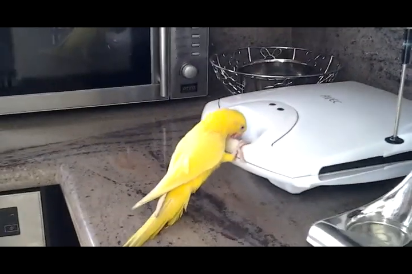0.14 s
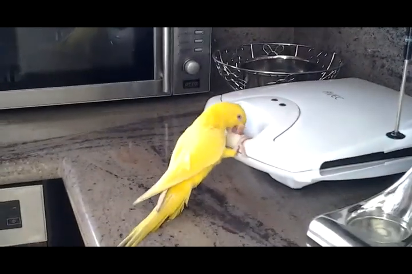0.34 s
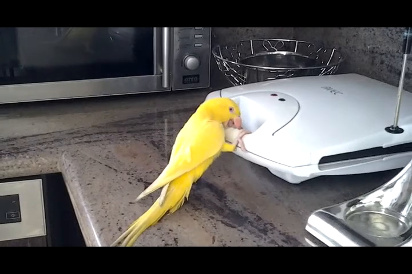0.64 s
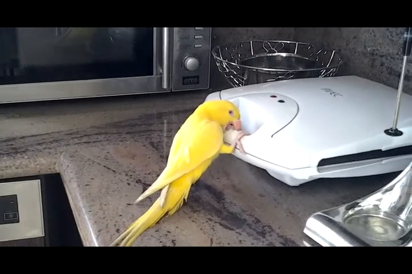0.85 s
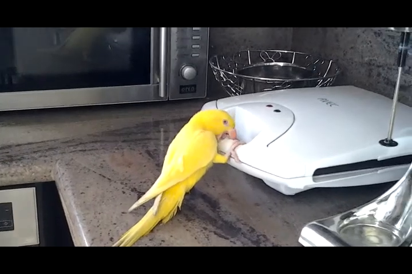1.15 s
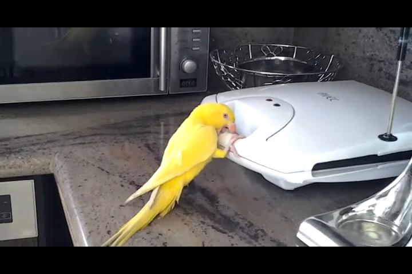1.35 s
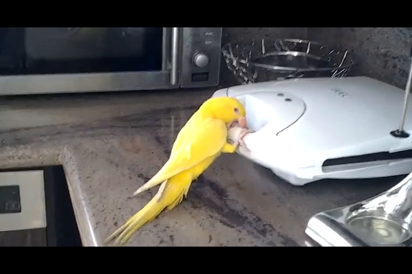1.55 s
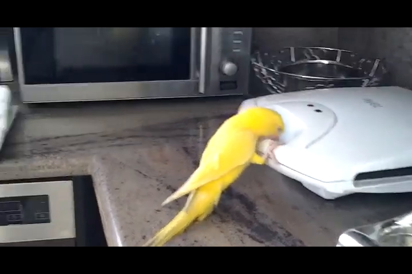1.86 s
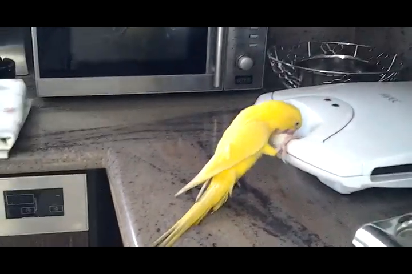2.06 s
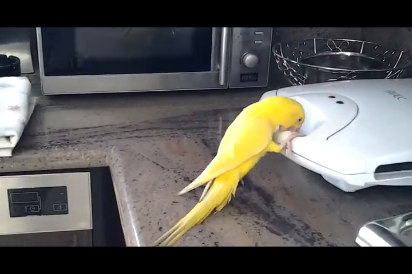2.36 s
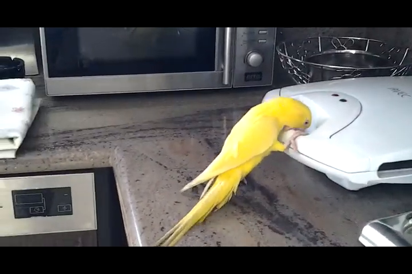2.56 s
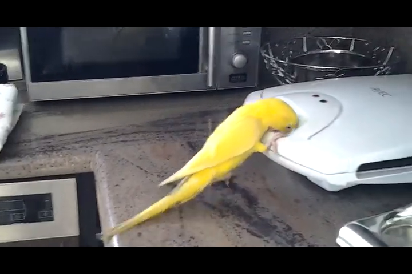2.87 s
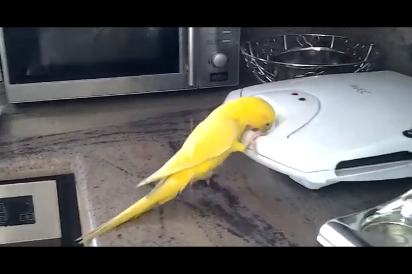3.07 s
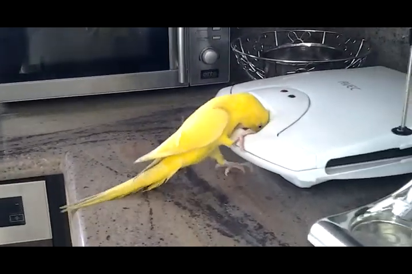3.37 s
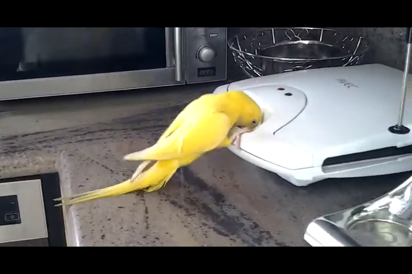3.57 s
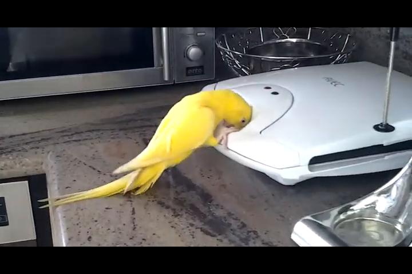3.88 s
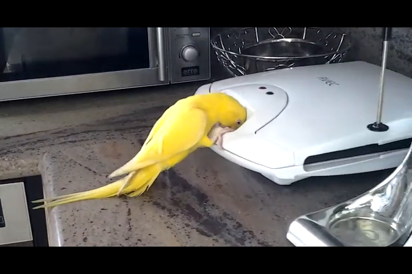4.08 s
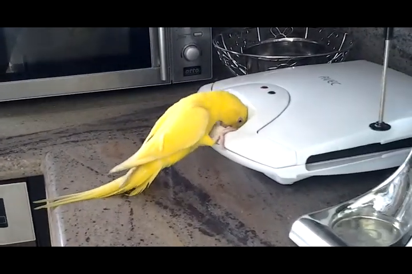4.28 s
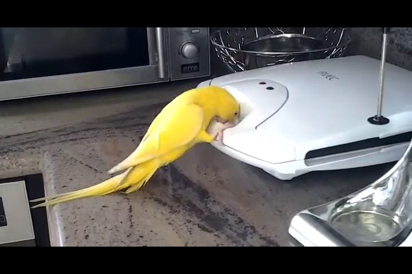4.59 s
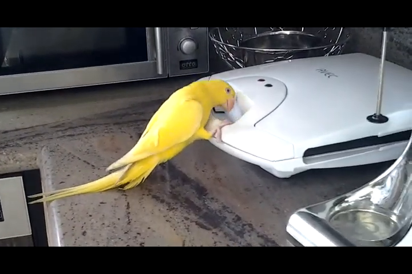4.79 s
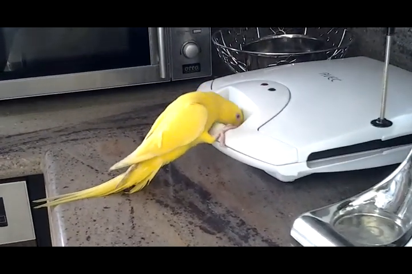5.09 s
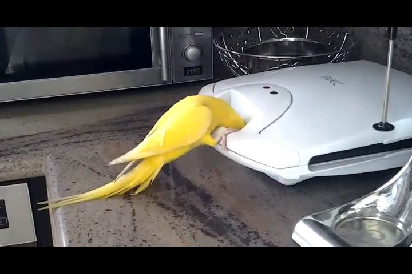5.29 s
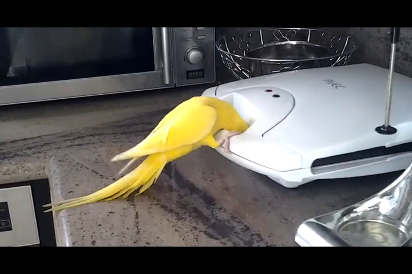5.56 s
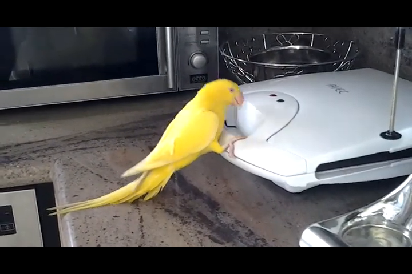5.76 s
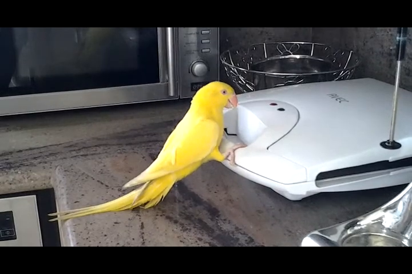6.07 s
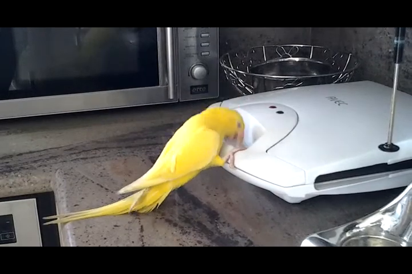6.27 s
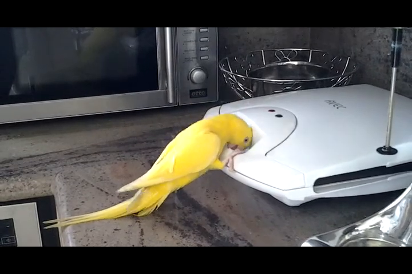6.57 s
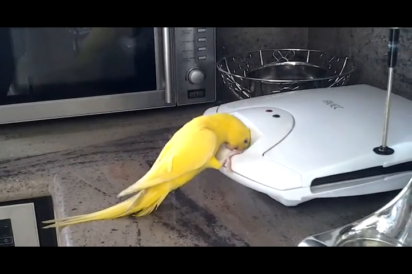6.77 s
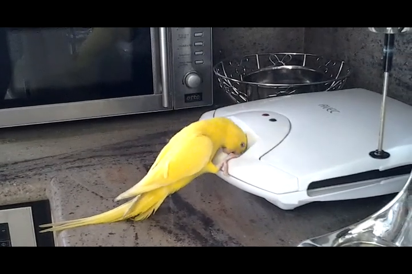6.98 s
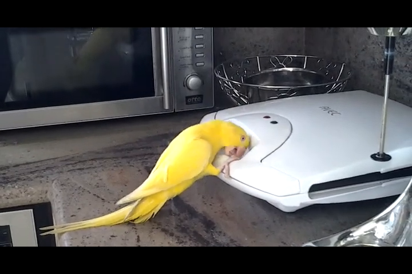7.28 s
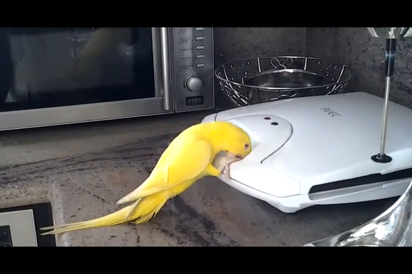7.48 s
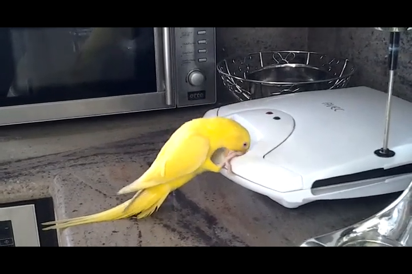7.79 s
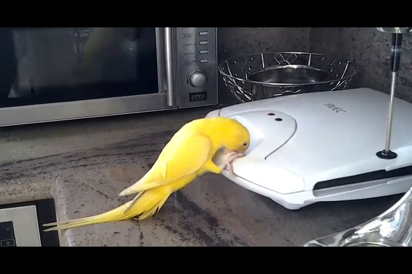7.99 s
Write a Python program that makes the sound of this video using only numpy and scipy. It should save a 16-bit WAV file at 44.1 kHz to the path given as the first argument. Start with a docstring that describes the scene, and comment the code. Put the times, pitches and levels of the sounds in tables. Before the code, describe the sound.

Uneven pecks and small scrapes of a bird's beak on a plastic shell, each with a short kitchen echo.

```python
"""A hard-walled kitchen, a phone microphone a metre from a parrot on an appliance's plastic lid.
Rumble and wavering hiss come first. The beak slides, lets go and pecks: each contact is a rattle of
slips that rings the lid and its hollow shell, and the walls add a tail. The loudest peck lands at 2 s.
At 3.5 s the beak drags across the lid and flicks a thin metal latch. The pecks thin out around 5 s,
then gather again to the end."""
import sys
import numpy as np
from scipy import signal
from scipy.fft import rfft, irfft
from scipy.io import wavfile
from scipy.ndimage import uniform_filter1d

SR = 44100
rng = np.random.default_rng(int(sys.argv[2]) if len(sys.argv) > 2 else 0)


def store_wav(level_fs):
    """Save 16-bit WAV to argv[1]."""
    pcm = np.round(np.clip(np.atleast_2d(level_fs), -1, 1) * 32767)
    wavfile.write(sys.argv[1], SR, pcm.T.astype(np.int16))


N = 358974

# colour of the rumble and hiss at the microphone: (frequency [Hz], relative density [dB])
FLOOR_SPECTRUM = [(15, -18), (25, -19), (43, -12), (103, -4), (234, -1.5), (716, -6), (775, -4.5),
                  (1680, -8.5), (4870, -12.5), (5860, -16), (6700, -13), (9990, -12), (13400, -12),
                  (14500, -16.5)]
# the longest dips of the hiss: (time [s], depth [dB], length [ms])
HISS_DIPS = [(0.207, 9.5, 50), (1.397, 4.5, 75), (1.747, 5, 77), (3.077, 9, 34), (4.654, 12.5, 19),
             (4.844, 5, 33), (5.201, 4, 88), (6.687, 4.5, 39), (7.545, 12, 24), (7.685, 7, 36)]
# the beak slides, pressing harder until it lets go: (start [s], end [s], last level [dB], treble [dB])
PRESSED_SLIDES = [(0.25, 0.293, -56, -7.5), (2.429, 2.453, -48, 2.5), (7.576, 7.596, -34.5, -17.5),
                  (7.946, 7.967, -56, -8), (7.99, 8.033, -54, -19.5)]
# reverberation of the kitchen: (band centre [Hz], t60 [s])
KITCHEN_DECAY = [(450, 0.96), (900, 0.6), (1900, 0.76), (4000, 0.51), (8500, 0.43)]
# beak and claw contacts: (time [s], level [dB], hardness [dB], panel pitch [Hz], tail [dB], contact [ms])
CONTACTS = [(0.295, -33.5, 0.4, 1170, 0.5, 9.7), (0.314, -40.5, 1, 1150, 0.5, 16),
            (0.809, -41.5, 5, 696, -1.5, 14), (1.818, -44.5, 1.4, 1520, 6, 4),
            (1.851, -41, -6, 490, -7, 11), (1.973, -9.5, -1.7, 1540, -2.1, 7.8),
            (2.254, -27, -2.7, 2203, -1.5, 12), (2.346, -34, -0.2, 1860, 0.5, 3.8),
            (2.452, -18, -2.5, 1070, 1.5, 10.8), (2.572, -25.5, -1.5, 1515, -6, 2.9),
            (2.753, -23.5, -3.4, 1115, -2.5, 8.9), (2.923, -26, -7, 1310, -10, 5.3),
            (3.109, -39, -8, 1560, 0, 4), (3.171, -50, 8, 980, 6, 14), (3.295, -53, 14.5, 1100, -12, 35),
            (3.385, -32.5, -3.5, 980, 2, 5), (3.409, -32, 6.5, 496, -1.5, 12),
            (3.502, -14.5, 7, 730, -4, 8.8), (3.59, -28, 8, 1290, -1.5, 6.3),
            (3.61, -31, -9.5, 710, 1.9, 7.1), (3.631, -54, 19, 910, -8, 18),
            (3.746, -46.5, 2.3, 865, 16, 18), (3.874, -29, -0.2, 1060, 0, 14),
            (4.214, -36.5, 2.2, 1400, 3, 6.1), (4.259, -33, -0.5, 2130, -20, 12),
            (4.308, -41.5, 0.2, 1130, 14, 9.5), (4.326, -30, -2, 2050, -22, 8),
            (4.359, -21.5, -1.8, 2120, -5, 13), (4.469, -35, 3, 685, 1, 17.4),
            (4.679, -40.5, 2, 1120, -0.5, 7.8), (5.39, -37, 3, 2550, 0, 9.8),
            (5.61, -37.5, 3.7, 720, -2.1, 9.3), (6.351, -24, 4, 1790, -5, 14),
            (6.395, -22.5, 3, 2210, -2.5, 17.5), (6.741, -40.5, 1.8, 1090, 9.5, 3.9),
            (6.892, -36.5, 1.3, 1100, -1.1, 6.1), (7.012, -32, 2.5, 1860, 5.5, 6.7),
            (7.027, -26, -2, 2130, -9, 15), (7.165, -34.5, 3, 2280, -7.5, 13),
            (7.416, -37, 2.5, 1750, -3, 10.3), (7.595, -23.5, -6.5, 714, -0.8, 9.1),
            (7.754, -32.5, 0, 1130, -6.5, 11.4), (7.906, -37.5, 0.5, 2070, 0.5, 8),
            (7.968, -29, 1.5, 2140, 2, 18), (8.025, -23.5, 0.3, 2150, -1.5, 10)]
# five registers of a contact, thud, body, knock, click and tick: (low edge [Hz], high edge [Hz])
REGISTER_EDGES = [(340, 620), (620, 1250), (1250, 2400), (2400, 4800), (5500, 12000)]
# the same registers: (level [dB], gain with hardness [dB/dB], length [contact times])
REGISTER_COLOUR = [(-4.5, -1, 2.15), (-1, -0.83, 1.28), (3.5, 0.13, 1.31), (5, 1.24, 0.97), (3, 2, 1.15)]
# modes of the lid's stiff edge: (frequency [Hz], level [dB], nominal t60 [s])
RIM_MODES = [(2451, -30.5, 0.0083), (3245, -35, 0.027), (3860, -37.5, 0.017)]
# modes of the hollow shell: (frequency [Hz], level [dB], nominal t60 [s])
SHELL_MODES = [(454.7, -2, 0.33), (494, -4, 0.45), (677, 3, 0.2), (868, -4.5, 0.47), (982, -6.5, 0.74),
               (1040, -12, 0.52), (1073, -1.5, 0.37), (1220, -13, 0.37), (1480, -27.5, 0.28),
               (1560, -9, 0.27), (1835, 5, 0.035), (2090, -1.5, 0.1), (2260, -5, 0.13)]
# flicks of the latch: (time [s], level [dB])
LATCH_FLICKS = [(3.502, -35), (3.63, -31.5), (3.748, -47)]
# modes of the thin metal latch: (frequency [Hz], level [dB], t60 [s])
LATCH_MODES = [(7600, -7, .02), (9800, -1, .03), (9990, -10, .15), (10090, -7, .2), (10150, -9, .16),
               (10890, -2, .03)]
# the beak drags across the lid: (time [s], level [dB], treble [dB])
BEAK_DRAG = [(3.505, -82, -3), (3.52, -35.5, -13), (3.57, -58, 6), (3.62, -41.5, -10), (3.66, -64, 7),
             (3.72, -62, 12)]

RUMBLE_DB, HISS_DB, CROSSOVER_HZ = -68.5, -63.5, 350
FLICKER_DB, SHORT_DIPS, SHORT_DIP_DB, SHORT_DIP_MS = 2, 20, 7.5, 18
LIFT_DB, HALF_LIFT_AT_DB, DUCK_DB, HALF_DUCK_AT_DB, PHONE_MEMORY_S = 12.5, -45.5, -9, -46, 0.059
KITCHEN_DB, FIRST_WALL_S, TAIL_WAVER_SHARE = -38.5, 0.012, 0.1
PANEL_DB, PANEL_T60_S, PANEL_SPREAD = -31, 0.035, 0.055  # spread: neighbour modes, as a share of pitch
SHELL_DB, STRIKE_SPOT_DB, BARE_SLIPS_DB = -40.5, 4.5, 2
FOCUS_DB_PER_OCT, THUD_LATE_MS = 3, 5.495
TOP_HZ = 14750


def undb(db):
    return 10 ** (np.asarray(db) / 20)


def unit(x):
    return x / np.sqrt(np.mean(x ** 2))


def band(x, lo_hz, hi_hz):
    return signal.sosfilt(signal.butter(3, [lo_hz, hi_hz], "band", fs=SR, output="sos"), x)


def waver():
    """The treble flickers at random and dips briefly; returns its gain in dB."""
    t = np.arange(N) / SR
    step = SR // 40
    steps = np.repeat(rng.standard_normal(N // step + 1), step)
    db = FLICKER_DB * uniform_filter1d(steps, step // 2)[:N]
    short = [(when * N / SR, SHORT_DIP_DB, (.5 + size) * SHORT_DIP_MS)
             for when, size in rng.random((SHORT_DIPS, 2))]
    for s, depth_db, length_ms in HISS_DIPS + short:
        db -= depth_db * np.exp(-(2 * (t - s) / (length_ms / 1000)) ** 2)
    return db


def phone_reaction(x, half_at_db):
    """How far the phone reacts, from 0 to 1, to the level it has just heard."""
    keep = np.exp(-1 / (PHONE_MEMORY_S * SR))
    level = np.sqrt(signal.lfilter([1 - keep], [1, -keep], x ** 2))
    return level / (level + undb(half_at_db))


def rumble_and_hiss(heard, waver_db):
    """The noise floor: the phone lets more hiss through with sound and ducks the rumble under clicks."""
    hz = np.arange(N // 2 + 1) * SR / N + 1
    knots_hz, knots_db = np.transpose(FLOOR_SPECTRUM)
    noise = rfft(rng.standard_normal(N)) * undb(np.interp(np.log(hz), np.log(knots_hz), knots_db))
    bass_share = 1 / (1 + (hz / CROSSOVER_HZ) ** 2)
    rumble, hiss = unit(irfft(noise * bass_share, N)), unit(irfft(noise * (1 - bass_share), N))
    lift_db = LIFT_DB * phone_reaction(heard, HALF_LIFT_AT_DB)
    duck_db = DUCK_DB * phone_reaction(band(heard, 3300, 11000), HALF_DUCK_AT_DB)
    return undb(RUMBLE_DB + duck_db) * rumble + undb(HISS_DB + lift_db + waver_db) * hiss


def beak_scrapes():
    """Dense uneven slips as the beak slides on the plastic: one drag and several swelling slides."""
    t = np.arange(N) / SR
    grit = rng.standard_normal(N) * undb(2.0 * rng.exponential(size=N))
    low, high = unit(band(grit, 540, 1640)), unit(band(grit, 4500, 9200))
    times, *columns = np.transpose(BEAK_DRAG)
    db, treble_db = [np.interp(t, times, column) for column in columns]
    dragging = (t > times[0]) & (t < times[-1])
    out = dragging * undb(db) * (low + undb(treble_db) * high)
    for start, end, db, treble_db in PRESSED_SLIDES:
        pressure = (t < end) * np.clip((t - start) / (end - start), 0, 1) ** 2
        out += pressure * undb(db) * (low + undb(treble_db) * high)
    return out


def kitchen(x):
    """Dense echoes reach the microphone from hard walls, each band dying at its own rate."""
    t = np.arange(int(.8 * SR)) / SR
    tail = 0
    for hz, t60 in KITCHEN_DECAY:
        tail += band(rng.standard_normal(len(t)), hz / 1.5, hz * 1.5) * 1000. ** (-t / t60)
    tail *= np.clip(t / FIRST_WALL_S, 0, 1) ** 2
    return undb(KITCHEN_DB) * signal.fftconvolve(x, tail)[:N]


def slips(contact_ms):
    """A short rattle of even colour, rising fast and dying with the contact."""
    progress = np.arange(4096) / SR / (contact_ms / 1000)
    shape = progress ** 0.62 * np.exp(-2.2 * progress)
    spectrum = rfft(shape * rng.standard_normal(len(shape)))
    return np.sqrt(shape) * irfft(spectrum / np.abs(spectrum))


def ring(modes, spot_db=0):
    """Impulse response of decaying modes; where the blow lands scatters their levels by spot_db."""
    hz, db, t60 = np.transpose(modes)[:, :, None]
    if spot_db:
        db = db + spot_db * rng.standard_normal(db.shape)
    t = np.arange(SR // 2) / SR
    decay = 1000. ** (-t / np.clip(t60, .01, .6))
    return np.sum(undb(db) * np.sin(2 * np.pi * hz * t) * decay, axis=0)


def peck(hardness_db, panel_hz, tail_db, contact_ms):
    """Slips in five registers ring panel, rim and shell; returns direct sound and the feed to the walls."""
    burst = 0
    for (lo, hi), (db, lean, stretch) in zip(REGISTER_EDGES, REGISTER_COLOUR):
        part = band(slips(stretch * contact_ms), lo, hi)
        if lo == REGISTER_EDGES[0][0]:  # the heavy shell answers last
            part = np.roll(part, int(THUD_LATE_MS * SR / 1000))
        off_pitch_db = FOCUS_DB_PER_OCT * abs(np.log2(np.sqrt(lo * hi) / panel_hz))
        burst += undb(db + lean * hardness_db - off_pitch_db) * part / np.linalg.norm(part)
    panel_modes = [(panel_hz * (1 + side * PANEL_SPREAD), -4.5 * abs(side), PANEL_T60_S)
                   for side in (-1, 0, 1)]
    lid = undb(PANEL_DB) * ring(panel_modes) + ring(RIM_MODES, STRIKE_SPOT_DB)
    lid[0] += 1  # the slips themselves are heard too
    shell = undb(SHELL_DB + tail_db) * ring(SHELL_MODES, STRIKE_SPOT_DB)
    blow = signal.fftconvolve(burst, lid)
    bare_slips = undb(BARE_SLIPS_DB) * np.pad(burst, (0, len(lid) - 1))
    return blow + signal.fftconvolve(burst, shell), undb(tail_db) * (blow + bare_slips)


def pecks():
    """Beak and claws strike the lid: one row goes straight to the microphone, one to the walls."""
    out = np.zeros((2, N + SR))
    for s, db, *contact in CONTACTS:
        one, at = np.array(peck(*contact)), int(s * SR)
        out[:, at:at + one.shape[1]] += undb(db) * one
    return out[:, :N]


def latch():
    """A thin metal part rings high when flicked and buzzes in its loose seat."""
    out = np.zeros(N + SR)
    for s, db in LATCH_FLICKS:
        flick, at = slips(contact_ms=6.0), int(s * SR)
        ting = signal.fftconvolve(flick / np.linalg.norm(flick), ring(LATCH_MODES, spot_db=1.3))
        out[at:at + len(ting)] += undb(db) * ting
    buzz = 1.15 + 0.63 * unit(band(rng.standard_normal(N), 25, 390))
    return out[:N] * buzz


def scene():
    """Mono, a metre from the lid: the parrot, the kitchen's tail and the noise floor."""
    direct, to_walls = pecks()
    rasp, ting, waver_db = beak_scrapes(), latch(), waver()
    tail = kitchen(to_walls + rasp + undb(-2) * ting)  # the small latch sends less to the walls
    tail *= undb(TAIL_WAVER_SHARE * waver_db)  # the tail wavers along with the hiss
    heard = direct + rasp + ting + tail
    return (heard + rumble_and_hiss(heard, waver_db))[None]


def record(dry):
    """The phone cuts the top of the treble steeply."""
    return signal.sosfilt(signal.ellip(10, .2, 60, TOP_HZ, fs=SR, output="sos"), dry)


dry = scene()
out = record(dry)
store_wav(out)
```